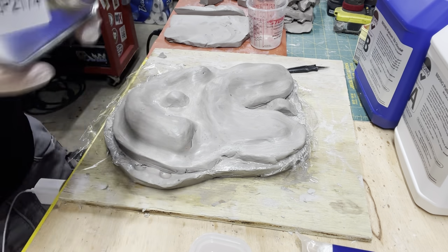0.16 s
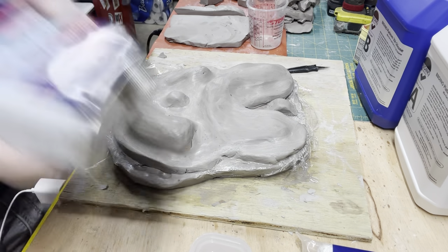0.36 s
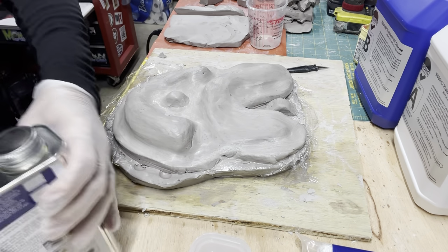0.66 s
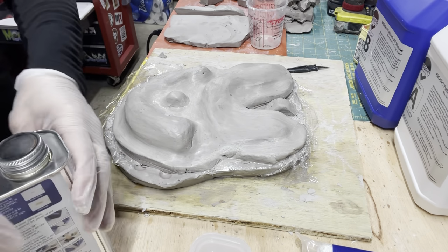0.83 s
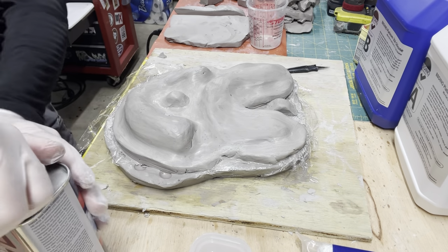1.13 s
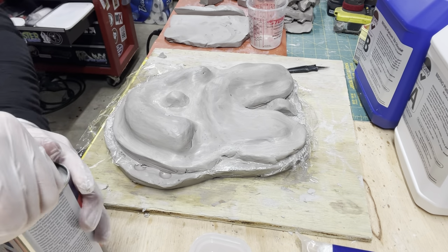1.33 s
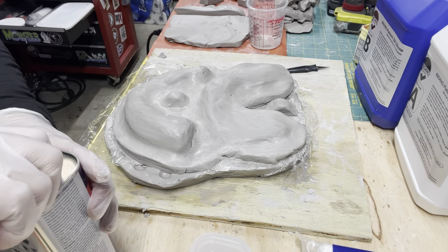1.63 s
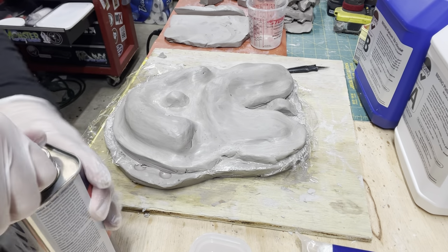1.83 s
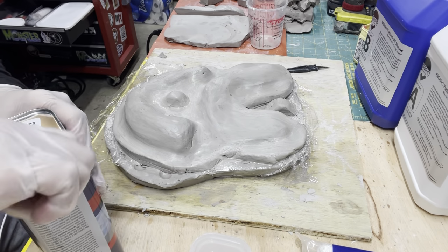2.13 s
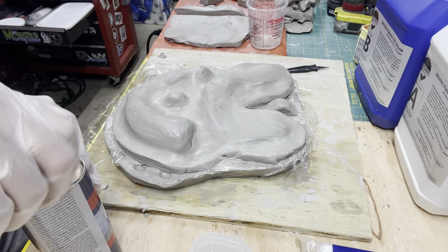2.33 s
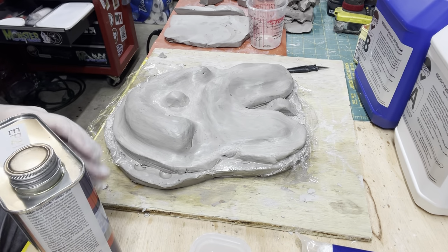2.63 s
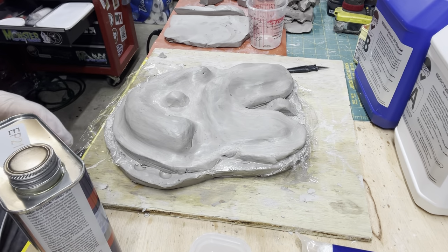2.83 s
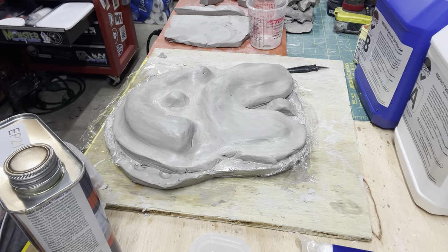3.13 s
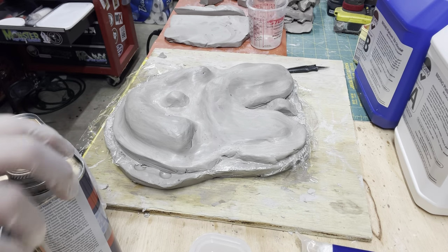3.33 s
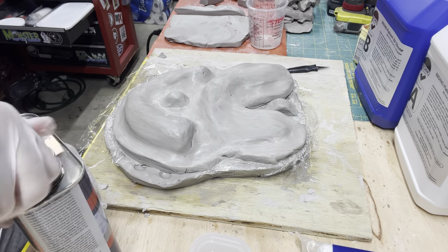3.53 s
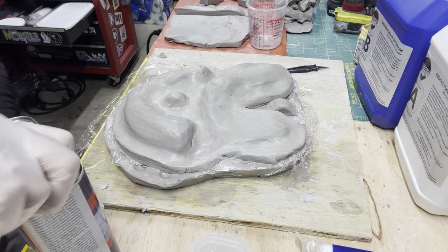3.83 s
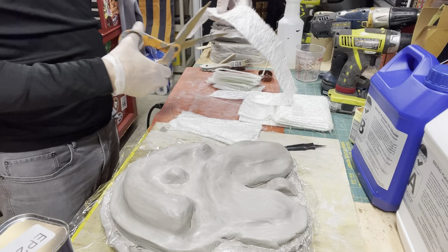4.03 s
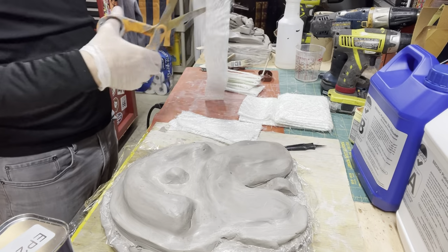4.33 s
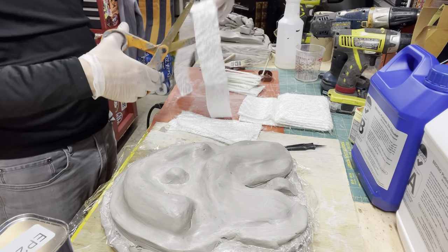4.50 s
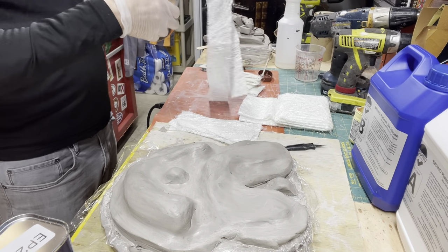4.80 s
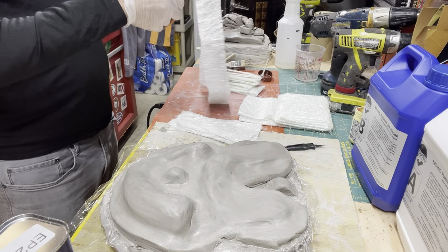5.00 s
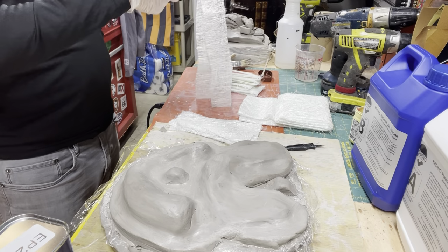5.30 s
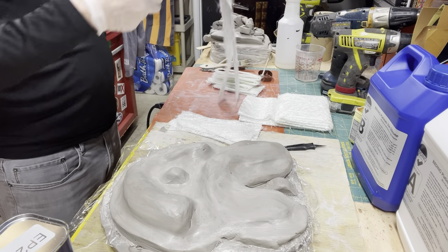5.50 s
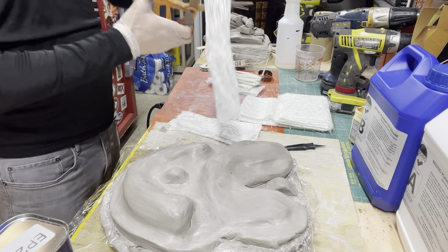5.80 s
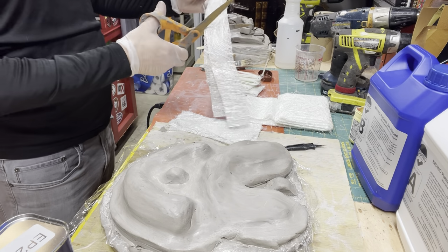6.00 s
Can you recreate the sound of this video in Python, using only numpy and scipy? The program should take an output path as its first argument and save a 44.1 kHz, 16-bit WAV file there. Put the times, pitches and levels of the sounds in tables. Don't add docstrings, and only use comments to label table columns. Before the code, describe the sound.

A half-full metal can is shaken and thumped down, its screw cap scuffed and clicked loose, then scissors softly snip fiber mat in a garage.

```python
import sys
import numpy as np
from scipy import signal
from scipy.fft import rfft, irfft
from scipy.io import wavfile
from scipy.ndimage import uniform_filter1d

SR = 44100
rng = np.random.default_rng(int(sys.argv[2]) if len(sys.argv) > 2 else 0)


def wrap_up_sound(samples):
    columns = np.atleast_2d(samples).T
    tamed = np.clip(columns, -1, 1)
    steps = np.round(tamed * 32767).astype(np.int16)
    wavfile.write(sys.argv[1], SR, steps)


def undo_db(level):
    steps = np.asarray(level, float) / 20
    return 10 ** steps


N = 271215
T = np.arange(N) / SR
HZ = np.maximum(np.fft.rfftfreq(N, 1 / SR), 1)
MOVE_S = 4.0565


def rms_one(x):
    return x / np.sqrt(np.mean(x ** 2) + 1e-20)


def in_time(rows):
    s, *columns = np.transpose(rows)
    return [np.interp(T, s, c) for c in columns]


def shaped(x, points):
    hz, db = np.transpose(points)
    return irfft(rfft(x) * undo_db(np.interp(np.log(HZ), np.log(hz), db)), N)


def band(x, low_hz, high_hz):
    edges = [low_hz, min(high_hz, .45 * SR)]
    return signal.sosfilt(signal.butter(2, edges, "band", fs=SR, output="sos"), x)


def drift(rate_hz):
    r = np.exp(-2 * np.pi * rate_hz / SR)
    settled = signal.lfilter([1], [1, -2 * r, r * r], rng.standard_normal(N + SR))[SR:]
    return rms_one(settled)


def ring(x, hz, t60):
    r = undo_db(-60 / (t60 * SR))
    w = 2 * np.pi * hz / SR
    return signal.lfilter([0, np.sin(w)], [1, -2 * r * np.cos(w), r * r], x + 1e-18)


def grains(per_s, spread_db):
    sizes = undo_db(spread_db * np.minimum(rng.exponential(1, N), 5)) * rng.choice([-1, 1], N)
    return rms_one(sizes * (rng.random(N) < per_s / SR))


def bump(at, swell, fade):
    out = np.zeros(N)
    first = max(int((at - 4 * swell - .004) * SR), 0)
    near = slice(first, int((at + 4 * fade + .004) * SR))
    since = T[near] - at
    width = np.where(since < 0, max(swell, .0004), max(fade, .0004))
    out[near] = np.exp(-(since / width) ** 2)
    return out


def impacts():
    # t/s, peak level/dB, f/Hz, length/s
    thumps = [(0.016, -42, 74.1, 0.012), (0.069, -43.5, 108, 0.016), (0.116, -30, 126, 0.021),
              (0.183, -34.5, 75, 0.028), (0.221, -36.5, 124, 0.0068), (0.249, -38.5, 58.9, 0.012),
              (0.264, -40, 59, 0.008), (0.352, -27, 113, 0.028), (0.381, -33.5, 113, 0.012),
              (0.485, -37, 95.3, 0.02), (0.625, -43.1, 76.4, 0.015), (0.678, -24, 73.8, 0.021),
              (0.787, -31.5, 102, 0.015), (0.817, -33, 92, 0.022), (0.864, -28, 102, 0.02),
              (0.91, -38, 102, 0.008), (0.926, -36.5, 54, 0.028), (0.951, -43, 65, 0.019)]
    # t/s, peak level/dB, f/Hz, length/s
    booms = [(0.0027, -28.5, 234, 0.0073), (0.0106, -38, 275, 0.0067), (0.0361, -28.5, 218, 0.018),
             (0.0609, -21.5, 206, 0.0097), (0.1076, -16, 186, 0.012), (0.1222, -30.5, 206, 0.0041),
             (0.1376, -34.5, 200, 0.0099), (0.1643, -36, 262, 0.0025), (0.1833, -19, 204, 0.01),
             (0.207, -31.5, 176, 0.013), (0.2307, -17, 249, 0.0083), (0.2393, -28, 219, 0.007),
             (0.2501, -35.5, 211, 0.0078), (0.2965, -37, 214, 0.0039), (0.3092, -32, 191, 0.0095),
             (0.3459, -22, 213, 0.0068), (0.3665, -36, 161, 0.0026), (0.3773, -33.5, 143, 0.011),
             (0.4313, -37, 225, 0.0047), (0.4682, -27.8, 231, 0.0057), (0.486, -31, 184, 0.026),
             (0.5092, -37.5, 191, 0.0079), (0.6158, -39, 223, 0.0074), (0.6641, -18.5, 181, 0.013),
             (0.6829, -26.5, 202, 0.0083), (0.6911, -24.5, 186, 0.0042), (0.705, -37, 217, 0.0024),
             (0.7214, -42.5, 124, 0.011), (0.7863, -18.5, 199, 0.0028), (0.7974, -28, 207, 0.0064),
             (0.8203, -27.7, 176, 0.0057), (0.8444, -35.5, 135, 0.0034), (0.8606, -27.5, 195, 0.005),
             (0.8719, -27.5, 133, 0.0049), (0.9153, -27, 220, 0.0083), (0.9835, -39.5, 183, 0.011)]
    # t/s, peak level/dB, f/Hz, length/s
    knocks = [(0.0502, -32.5, 564, 0.0014), (0.0559, -27, 580.4, 0.0093), (0.1041, -25, 606, 0.0087),
              (0.1097, -28, 577, 0.0012), (0.1698, -22, 482, 0.0026), (0.1758, -34, 469, 0.0024),
              (0.1826, -21, 609, 0.0028), (0.1886, -30, 522, 0.0012), (0.1955, -40, 504.6, 0.002),
              (0.2245, -22.5, 513, 0.00097), (0.2307, -20, 596, 0.0034), (0.2968, -30.5, 601, 0.0045),
              (0.3442, -34, 537, 0.0015), (0.3509, -21, 626, 0.014), (0.3622, -36.5, 604, 0.0027),
              (0.4257, -27, 545, 0.0039), (0.4727, -22.5, 528, 0.0038), (0.6158, -35.5, 531, 0.0035),
              (0.6619, -16, 519.6, 0.0026), (0.6699, -7, 450, 0.0015), (0.6781, -32.5, 519, 0.0017),
              (0.6861, -33.5, 474, 0.0049), (0.6985, -66, 547, 0.0024), (0.708, -38.5, 495, 0.002),
              (0.7742, -28.5, 512, 0.0018), (0.7821, -22, 472, 0.0017), (0.7878, -23, 485, 0.0018),
              (0.7994, -41.5, 518, 0.0023), (0.8103, -30, 566, 0.0021), (0.8163, -31, 522, 0.0024),
              (0.8537, -27.5, 471.5, 0.0042), (0.8599, -23.5, 578, 0.002), (0.8682, -33.5, 527, 0.0017),
              (0.8996, -28, 706, 0.0024), (0.905, -21.5, 632, 0.0018), (0.9105, -21.5, 471, 0.0015)]
    # t/s, peak level/dB, f/Hz, length/s
    pings = [(0.055, -23, 1226, 0.0011), (0.0607, -29, 1476, 0.00056), (0.0659, -44, 1426, 0.0011),
             (0.102, -42, 1910, 0.0014), (0.1069, -29.5, 1864, 0.0069), (0.112, -36.5, 1780, 0.00094),
             (0.1735, -19, 1090, 0.0026), (0.1788, -46, 1279, 0.00096), (0.1837, -32.5, 1985, 0.0015),
             (0.1887, -33, 1623, 0.00067), (0.1964, -42, 1454, 0.0032), (0.2195, -32, 1830, 0.0008),
             (0.2252, -33.5, 1525, 0.0025), (0.2298, -15, 1120, 0.0029), (0.2455, -45, 1093, 0.0015),
             (0.2938, -36.5, 2600, 0.007), (0.3426, -39.5, 1890, 0.00048), (0.3466, -16.5, 1465, 0.004),
             (0.3537, -22, 1108, 0.0012), (0.3599, -39, 1414, 0.0011), (0.364, -45.5, 1463, 0.0017),
             (0.425, -39, 1190, 0.0034), (0.4685, -46, 1435, 0.013), (0.4739, -35, 1443, 0.0027),
             (0.6126, -32.5, 1206, 0.0022), (0.6582, -19.5, 1258, 0.0047), (0.6622, -14.5, 1325, 0.0027),
             (0.6663, -23.5, 1437, 0.00078), (0.6761, -32.5, 1351, 0.0012), (0.6827, -33, 1155, 0.00097),
             (0.6875, -36.5, 1448, 0.0009), (0.6957, -42.5, 1526, 0.0019), (0.7747, -39.5, 1316, 0.0027),
             (0.8549, -34.5, 1170, 0.0014), (0.8593, -32.5, 1060, 0.0018), (0.9057, -45, 1084, 0.0051)]
    knock_partials = (.7, 1.15)
    ping_partials = (0.93, 1.42)
    layers = [(thumps, -1.5, [1]), (booms, 0.0, [1]),
              (knocks, -6.0, knock_partials), (pings, -4.0, ping_partials)]
    hits = np.zeros(N)
    for rows, layer_db, partials in layers:
        for s, db, hz, length in rows:
            phase = rng.uniform(0, 2 * np.pi)
            if hz > 330:
                length = max(length, 0.84 / hz)
            if rows is booms and s > .75:
                db = db - 3.5
            tone = sum(np.cos(2 * np.pi * hz * ratio * (T - s) + phase) for ratio in partials)
            hits += undo_db(db + layer_db) * bump(s, .48 * length, .42 * length) * tone
    return hits


def churning():
    # t/s, deep level/dB, middle level/dB, splash level/dB
    slaps = [(.001, -30.5, -32, -31.5), (0.049, -31, -32.5, -30), (.097, -22, -45, -26),
             (0.172, -26.5, -24.5, -18.5), (0.217, -23, -33, -23), (0.287, -39, -47.5, -33),
             (0.337, -21.5, -28.5, -22), (0.417, -40.5, -38, -69), (.463, -21.5, -28, -41.5),
             (0.607, -38.5, -43.5, -39), (0.652, -10.5, -6, -25), (0.771, -26, -27.5, -44.5),
             (0.806, -33.5, -35, -63), (0.851, -32, -28.5, -38), (.897, -30, -24.5, -49),
             (0.945, -42, -44, -45), (0.975, -43.5, -41, -62.5), (1.233, -64.5, -44.5, -64)]
    churn, out = grains(per_s=2900, spread_db=2.0), np.zeros(N)
    for s, deep_db, middle_db, splash_db in slaps:
        span = slice(max(int((s - .03) * SR), 0), int((s + 0.26) * SR))
        late = T[span] - s - .006
        for low_hz, high_hz, part_db, fade_s in [(73.2, 240, deep_db - 14.0, 0.012),
                                                 (300, 690, middle_db - 8.0, 0.014),
                                                 (900, 2110, splash_db - 12.0, 0.012),
                                                 (2300, 4200, splash_db - 23.0, 0.006)]:
            swash = np.exp(-np.maximum(late, 0) / fade_s - (np.minimum(late, 0) / 0.0039) ** 2)
            out[span] += undo_db(part_db) * swash * rms_one(band(churn[span], low_hz, high_hz))
    return out


def shaken_can():
    # f/Hz, level/dB, t60/s
    bench = [(207, -5.5, .09), (387, 4, 0.05), (482, -22.5, .1), (620, 2.5, 0.065), (770, -11, .07),
             (898, -10.5, 0.11), (930, -11, .08), (1030, -11, .08), (1160, -11, 0.1), (1273, -8, 0.1),
             (1380, -11, 0.095), (1700, -8.5, 0.065), (2010, -15, .08), (2430, -12, .08), (2896, -11, .05)]
    hits = impacts()
    ringing = sum(undo_db(db - 47) * ring(hits, hz, t60) for hz, db, t60 in bench)
    return hits + ringing + churning()


def patchy(x, depth_db):
    cells = signal.stft(x, nperseg=256)[2]
    field = rng.standard_normal(cells.shape)
    for axis, size in enumerate((4, 8)):
        for _ in range(2):
            field = uniform_filter1d(field, size=size, axis=axis)
    return signal.istft(cells * undo_db(depth_db * rms_one(field)), nperseg=256)[1][:N]


def resonant(x, peaks, direct_db):
    out = undo_db(direct_db) * x
    for k, (hz, width_hz, db) in enumerate(peaks):
        peak = signal.iirpeak(hz, hz / max(width_hz * 2, 150), SR)
        out = out + (-1) ** k * undo_db(db) * signal.lfilter(*peak, x)
    return out


def friction_levels():
    # t/s, level/dB, brightness/dB
    rubbing = [(0.0, -67, 2.5), (1.42, -71, -1.5), (1.69, -82.5, 0.5), (2.3, -71, 2.5), (2.84, -90.5, 5),
               (3.01, -85, 4.5), (3.29, -82, 9.5), (3.51, -67.5, -4), (3.58, -74, 9.5), (3.73, -70.5, -5),
               (3.89, -83, 13.5), (4.06, -89.5, -5), (4.85, -89.5, 6.5), (5.12, -82.5, 7),
               (5.29, -76.5, -19), (5.45, -83.5, 6), (6.0, -86.5, -2.5), (6.15, -83.5, 4.5)]
    # t/s, peak level/dB, brightness/dB
    spray = [(.056, -78.5, -19), (0.107, -58.5, 0), (0.182, -56, 1.8), (0.223, -48, -3.5),
             (.293, -66.5, -5.5), (0.346, -54, -1), (0.47, -55, 0), (0.599, -56, -8.5), (0.661, -62, -18),
             (0.769, -64.5, 3.8), (.802, -75, 6.5), (0.854, -59.5, 1), (0.905, -54.5, 0.5)]
    # t/s, peak level/dB, brightness/dB, rise/s, fall/s
    cap_scuffs = [(0.986, -64.5, 3.5, 0.11, 0.043), (1.056, -55, 0.9, 0.015, 0.0051),
                  (1.237, -64, -3.5, 0.061, 0.022), (1.414, -55, -1.5, 0.044, 0.077),
                  (1.539, -61.5, -1.7, 0.026, 0.037), (1.672, -59, -5, 0.0087, 0.038),
                  (1.841, -62.5, -7, 0.024, 0.086), (1.913, -60, -0.5, 0.058, 0.046),
                  (2.065, -59, -2, 0.0079, 0.023), (2.16, -50, -5, 0.044, 0.057),
                  (2.205, -43, -5, 0.015, 0.016), (2.321, -74, 4.5, 0.022, 0.018),
                  (2.36, -36.5, -1.5, 0.0048, 0.0074), (2.386, -50.5, -6.5, 0.029, 0.039),
                  (2.437, -42, 0, 0.02, 0.014), (2.482, -61.5, -9, 0.12, 0.022),
                  (2.601, -64, 3.5, 0.03, 0.046), (2.724, -58, -0.2, 0.023, 0.025),
                  (2.808, -69.5, 1.5, 0.01024, .013), (2.923, -71, 3.5, 0.0052, 0.02)]
    # t/s, peak level/dB, brightness/dB, rise/s, fall/s
    regrip_scuffs = [(3.24, -67.5, 10.5, 0.0061, 0.0149), (3.37, -40.5, 1.5, 0.01238, 0.012),
                     (3.421, -46, -3.5, 0.038, 0.01926), (3.468, -48.5, -2.5, .018, 0.018),
                     (3.513, -60, 5.5, 0.0044, 0.02324), (3.573, -59, 6, 0.029, 0.0077),
                     (3.646, -50.5, -4, 0.037, 0.027), (3.739, -58, 3.5, 0.0091, 0.044),
                     (3.901, -70, -4.5, 0.11, 0.042), (3.991, -60, 0.3, 0.02, 0.035),
                     (4.052, -62.5, -2.5, 0.0079, 0.0022)]
    # t/s, peak level/dB, brightness/dB, rise/s, fall/s
    snips = [(4.13, -78, 6.5, 0.01485, .029), (4.229, -84, 10.5, 0.051, 0.0184),
             (4.314, -72.5, -1, 0.019, 0.015), (4.35, -80.5, 10, 0.015, 0.0079),
             (4.388, -67, -5.5, 0.011, 0.036), (4.471, -83, 12, 0.059, 0.046),
             (4.545, -78, 15.5, 0.015, 0.042), (4.695, -101, 26, 0.027, 0.015),
             (4.793, -74, 16, 0.015, 0.0405), (4.94, -65, 5, 0.0146, 0.065),
             (5.017, -65.5, 7.5, 0.027, 0.026), (5.074, -71, 7.5, 0.013, .02),
             (5.112, -72.5, 15.5, 0.0091, 0.011), (5.152, -66.5, 9, .021, 0.015),
             (5.228, -61, 6.5, 0.04, 0.13), (5.301, -47.5, 7, 0.02246, 0.0233),
             (5.414, -47.5, -1.2, 0.014, 0.0212), (5.611, -77.5, 16, 0.0075, 0.021),
             (5.697, -83.5, 13.5, 0.017, 0.066), (5.829, -81, 7, 0.011, 0.08),
             (5.928, -62.5, 2, 0.016, 0.018), (6.001, -57.5, 4.5, 0.028, 0.033),
             (6.035, -58.5, 3, 0.042, 0.0395)]
    tilt = np.array([[-1.204], [0], [0.9]])
    rub_db, rub_bright_db = in_time(rubbing)
    power = undo_db(rub_db - 3.0 + tilt * rub_bright_db) ** 2
    splashes = [(*row, 0.018, 0.0062) for row in spray]
    for s, db, bright_db, swell, fade in splashes + cap_scuffs + regrip_scuffs + snips:
        power += (undo_db(db - 5.5 + tilt * bright_db) * bump(s, swell, fade)) ** 2
    return np.sqrt(power)


def friction():
    # f/Hz, width/Hz, level/dB
    cap = [(600, 60, -5.5), (1195, 73, 10), (1470, 810, -3.5), (2096, 56, 10.5), (3247, 120, -3.5),
           (4850, 180, 6), (6120, 110, -3), (7094, 110, 0)]
    # f/Hz, width/Hz, level/dB
    blades = [(1500, 120, 4.5), (2820, 110, 11), (3640, 360, 5.5), (4230, 100, 12.5), (5950, 130, 4),
              (7030, 110, 7.5), (8760, 250, 7.5), (10240, 170, 9), (11700, 1400, 4.5)]
    body_level, scratch_level, hiss_level = friction_levels()
    slips = patchy(grains(per_s=6000, spread_db=2.8), depth_db=2.9)
    slips = slips * undo_db(1.2 * drift(31))
    near = T < MOVE_S
    on_cap = rms_one(resonant(slips, cap, -1.5))
    on_blades = rms_one(resonant(slips, blades, 0.23))
    voiced = np.where(near, on_cap, on_blades)
    body = rms_one(band(voiced, 330, 2507))
    scratch = rms_one(band(voiced, 1900, 7600))
    hiss = shaped(voiced, [(5000, -44), (6800, -3.0), (8500, -2.0), (11000, -5.0), (13500, -6.0), (15500, -7.5)])
    hiss = hiss / np.where(near, np.std(hiss[near]), np.std(hiss[~near]))
    body_gain = undo_db(1.0 - 2.5 * (T > MOVE_S))
    return body_gain * body_level * body + undo_db(3.0) * scratch_level * scratch + undo_db(7.0) * hiss_level * hiss


def squeak():
    # start t/s, from f/Hz, to f/Hz, level/dB
    squeal = (4.047, 2640, 2760, -50)
    start, from_hz, to_hz, db = squeal
    part = np.clip((T - start) / (MOVE_S - start), 0, 1)
    phase = 2 * np.pi * np.cumsum(from_hz + (to_hz - from_hz) * part + 50 * drift(200)) / SR
    grip = .3 * bump(start - .004, .0025, .002) + bump(start + .002, .002, .012)
    neighbour = .7 * bump(start + .005, .003, .004) * np.sin(1.22 * phase)
    return undo_db(db) * (grip * np.sin(phase) + neighbour) * (T < MOVE_S)


def ticks():
    # t/s, peak level/dB, f/Hz
    catches = [(2.049, -48.5, 3500), (2.109, -47, 1000), (2.146, -54, 900), (2.157, -41, 1050),
               (2.198, -52, 1200), (2.269, -46, 1230), (2.358, -30, 860), (2.422, -54, 3330),
               (2.71, -37.5, 600), (2.812, -54, 600), (3.235, -68, 2000), (3.338, -38, 800),
               (3.368, -32.5, 2080), (3.416, -55, 2200), (3.430, -43.5, 202), (3.491, -44.5, 300),
               (3.510, -46.5, 2020), (3.572, -43, 4930), (3.602, -46.5, 2040), (3.737, -46.5, 2140),
               (3.763, -50, 740), (4.384, -56, 1100), (4.387, -62.5, 2900), (5.291, -56, 1350),
               (5.109, -64, 3465), (5.517, -72.5, 2110), (5.608, -57.5, 4360), (5.743, -64, 2020),
               (5.765, -66.5, 1974), (5.406, -44, 2700)]
    out, clicks = np.zeros(N), grains(per_s=3500, spread_db=2.5)
    for s, db, hz in catches:
        burst = clicks * bump(s + .002, .0016, .003)
        burst = undo_db(db) * burst / np.sqrt(np.sum(burst ** 2))
        out += ring(burst, hz, 20.0 / hz)
        out += 0.473 * ring(burst, hz * 1.32, 21.0 / hz)
        out += 0.3 * ring(burst, hz * 0.8, 6.4 / hz)
    return band(out, 59, 9000)


def whistles():
    # start t/s, end t/s, from f/Hz, to f/Hz, level/dB
    glides = [
        (4.92, 5.05, 11500, 12200, -62),
        (5.19, 5.31, 13600, 15600, -60),
        (5.265, 5.325, 6500, 11000, -52),
        (5.395, 5.44, 8600, 8300, -56),
        (1.225, 1.265, 395, 405, -50),
        (5.43, 5.50, 730, 720, -69),
        (3.355, 3.445, 2150, 2080, -56),
        (5.80, 5.96, 640, 660, -66),
        (5.9, 5.97, 11000, 11600, -66),
        (5.97, 6.09, 12200, 15000, -60),
    ]
    out = np.zeros(N)
    for start, end, from_hz, to_hz, db in glides:
        width_hz = .035 * to_hz
        part = np.clip((T - start) / (end - start), 0, 1)
        phase = 2 * np.pi * np.cumsum(from_hz + (to_hz - from_hz) * part) / SR
        tone = drift(width_hz) * np.cos(phase) + drift(width_hz) * np.sin(phase)
        out += undo_db(db + 0.5) * np.sin(np.pi * part) * tone
    return out


def echoes(x, t60):
    t = np.arange(int(t60 * SR)) / SR
    tail = rng.standard_normal(len(t)) * undo_db(-60 * t / t60)
    return signal.fftconvolve(x, tail / np.sqrt(np.sum(tail ** 2)))[:N]


def rumble():
    # f/Hz, level/dB
    rumble_near = [(12, -39), (20, -8), (76, 3), (139, -13.5), (200, -11.5), (352, -17.5), (398, -12.5),
                   (458, -24), (620, -16), (730, -30.5), (900, -32.5), (1640, -44.5), (2500, -51),
                   (3250, -50), (5500, -120)]
    # f/Hz, level/dB
    rumble_far = [(12, -75), (20, -42.5), (51, 2), (75, -2.5), (105, -4.5), (129, -16), (205, -13.5),
                  (293, -18), (401, -15), (436, -21.5), (636, -20.5), (760, -31), (900, -33), (3000, -54.5),
                  (3900, -88), (6600, -120)]
    # t/s, level/dB
    airflow = [
        (0, -60),
        (.9, -52),
        (1.5, -63),
        (2.3, -57.5),
        (2.8, -64.5),
        (3.15, -68),
        (3.55, -59),
        (4.1, -68),
        (6.15, -66.5),
    ]
    white = rng.standard_normal(N)
    near, far = shaped(white, rumble_near), shaped(white, rumble_far)
    near = near / np.std(band(near, 300, 890))
    far = far / np.std(band(far, 300, 890))
    air = np.where(T < MOVE_S, near, far)
    deep = irfft(rfft(air) / (1 + (HZ / 200) ** 4), N)
    upper_db, = in_time(airflow)
    return undo_db(-54.5) * rms_one(deep) + undo_db(upper_db - 3.0 + 3.3 * drift(2.5)) * (air - deep)


def scattered(x, lags):
    spectrum = rfft(x)
    for lag in lags:
        delay = np.exp(-2j * np.pi * HZ * lag / SR)
        spectrum = spectrum * (delay - .55) / (1 - 0.64 * delay)
    return irfft(spectrum, N)


def scene():
    # f/Hz, level/dB
    spread = [(40, -21.5), (150, -15.5), (350, -5.5), (700, 1), (1400, -5), (2500, -3), (4500, -1),
              (7000, -1.5)]
    close = shaken_can() + friction() + whistles() + ticks() + squeak()
    garage = echoes(close, t60=.2) * (np.abs(T - MOVE_S - .05) > .05)
    mid = close + undo_db(-19.5) * garage + rumble()
    turn = 3.45 + 2.74 * drift(4.5)
    side = np.cos(turn) * scattered(mid, (5, 13, 29)) + np.sin(turn) * scattered(mid, (7, 17, 37))
    quadrature = -.3
    side = quadrature * signal.hilbert(mid).imag + np.sqrt(1 - quadrature ** 2) * side
    right_db = 3.4
    side = shaped(side, spread) - np.tanh(np.log(undo_db(right_db)) / 2) * mid
    return np.array([mid + side, mid - side])


def band_limit(x):
    return signal.sosfilt(signal.butter(12, 15830, fs=SR, output="sos"), x)


def record(dry):
    treble_hz, treble_lag_s, cutoff_hz = 6300, .0001745, 15830
    since = T - MOVE_S
    fade = np.where(since < 0, np.clip(-since / .002, 0, 1), np.clip(since / .035, 0, 1))
    left, right = rfft(dry * fade, axis=1)
    treble = np.clip((HZ - treble_hz) / 1500 + .5, 0, 1)
    both = (left + right) / 2
    late = both * np.exp(-2j * np.pi * HZ * treble_lag_s)
    left = left + treble * (both - left)
    right = right + treble * (late - right)
    wet = irfft(np.array([left, right]) * (HZ < cutoff_hz), N, axis=1)
    return band_limit(wet)


dry = scene()
out = record(dry)
wrap_up_sound(out)
```